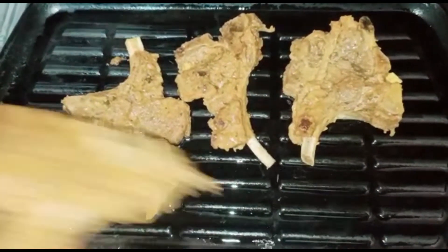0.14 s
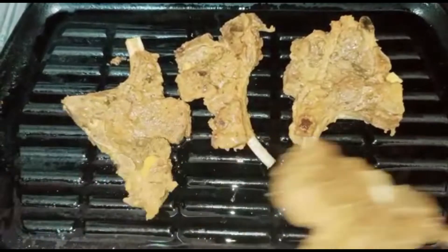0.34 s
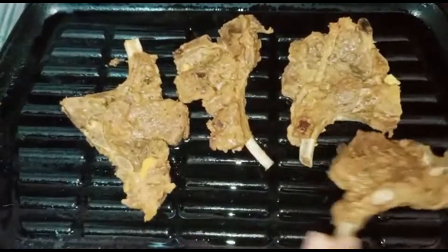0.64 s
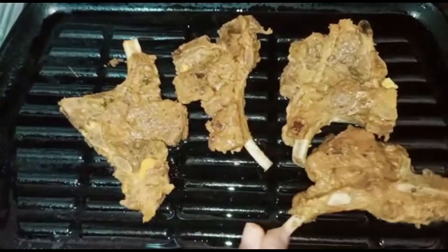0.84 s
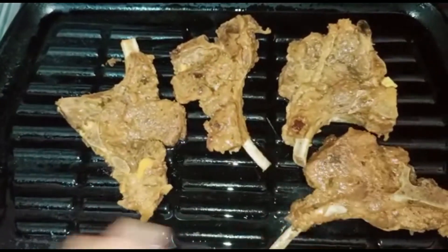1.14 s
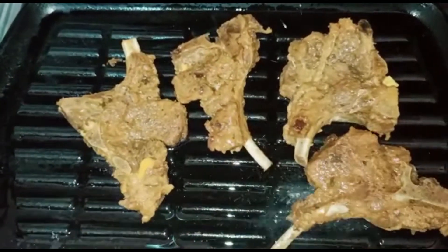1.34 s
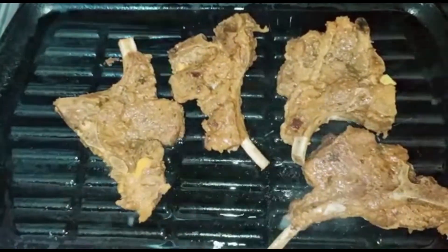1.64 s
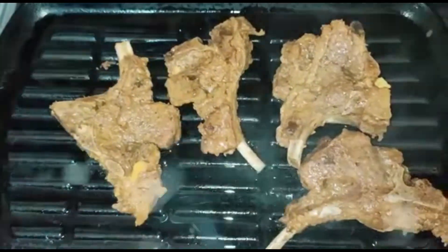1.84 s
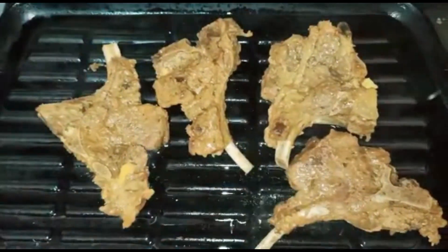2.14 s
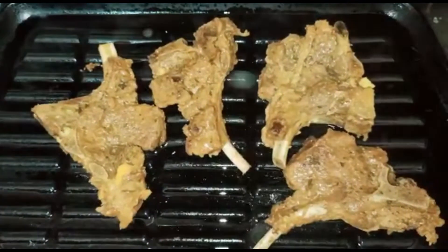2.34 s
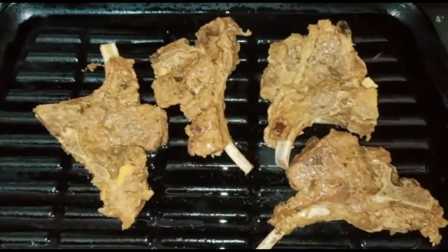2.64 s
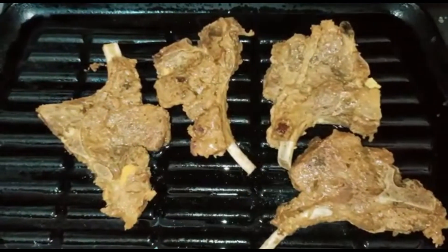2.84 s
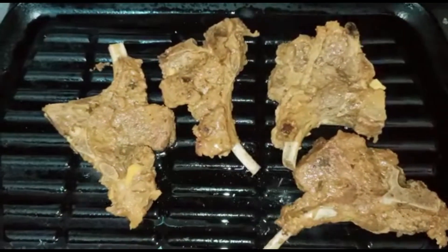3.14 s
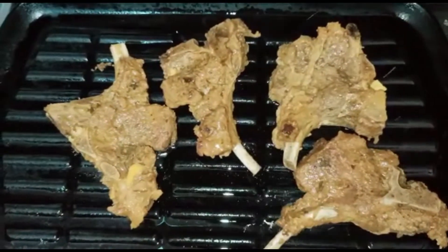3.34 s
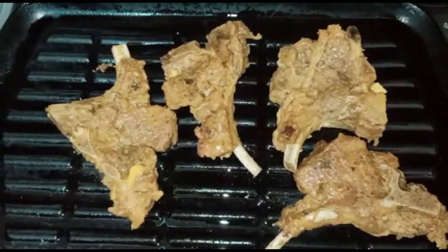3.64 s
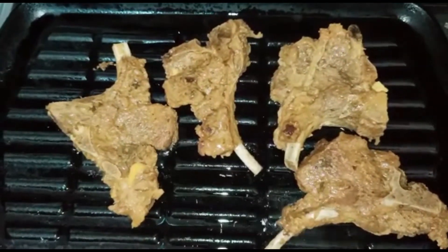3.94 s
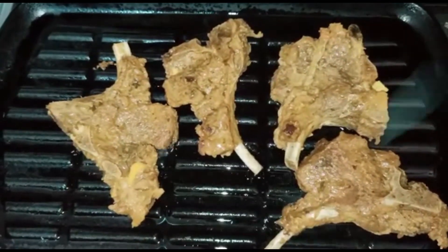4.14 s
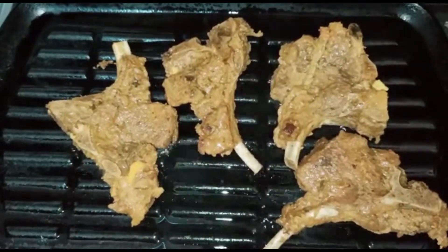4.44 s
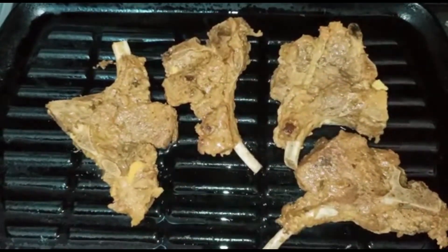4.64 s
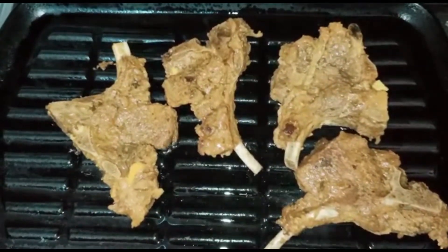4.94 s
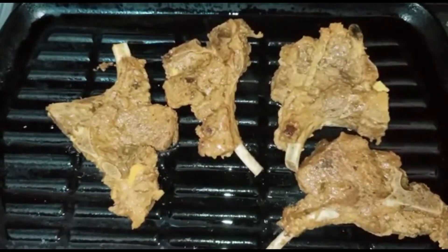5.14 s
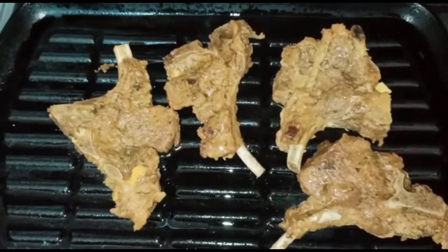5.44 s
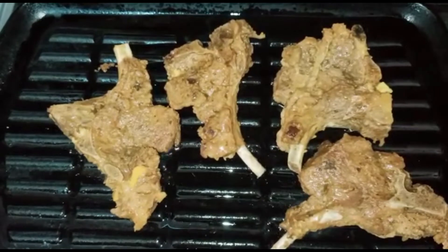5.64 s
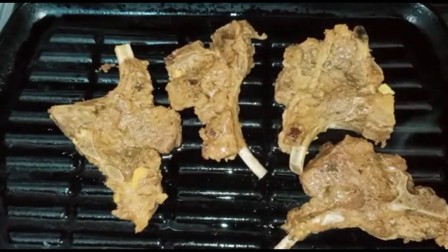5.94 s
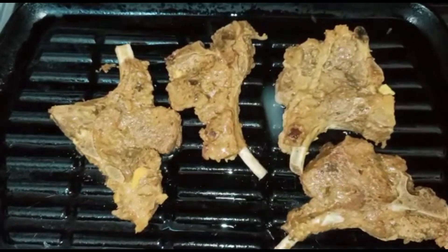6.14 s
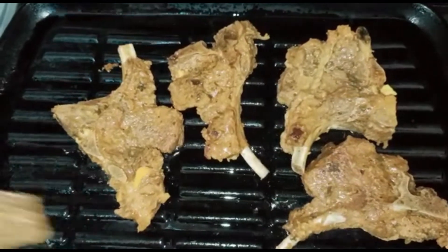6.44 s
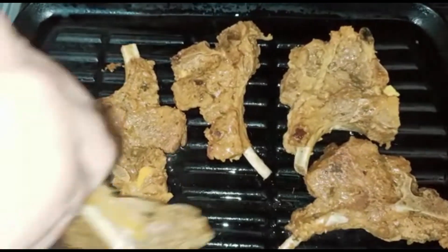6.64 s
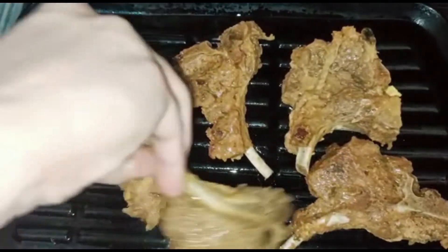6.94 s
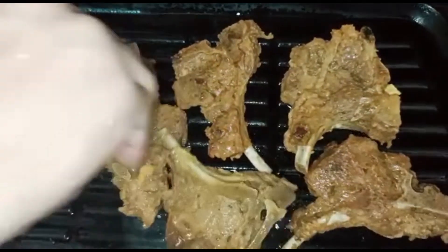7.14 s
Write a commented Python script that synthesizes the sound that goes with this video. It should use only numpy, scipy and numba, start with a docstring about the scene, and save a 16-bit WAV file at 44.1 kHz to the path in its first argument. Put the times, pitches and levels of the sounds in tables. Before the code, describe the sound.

Chops sizzle on a hot ribbed pan, heard close in stereo with almost no room sound. From 0 s a dense, crisp fry of tiny bursting fat bubbles and hissing steam is already running, with many sharp, bright pops per second spread left and right, each with a very short hard echo. Faint dull bumps occur around 0.9-1 s. At about 1.2-1.4 s a quiet, brief low tone dips and rises within soft rustling. From 1.5 s the sizzle grows, flaring fullest at about 1.85-2.1 s, then calms by 2.7 s, remaining slightly stronger than at the start. Crackling continues steadily, with strong snaps near 2.5 and 3.1 s, clustered pops and sputters around 3.8-4.3 s, and another sputter near 5.3 s. Barely audible low rumble, wavering hum, soft blips and occasional dull thuds sit underneath. Frying continues unbroken to the end at 7.3 s.

```python
"""Chops sizzle on a hot ribbed pan under a phone with two microphone ports, over rumble, hum and low noise bands.
From the start, damped sines make bubbles bursting in fat and sharper pops; filtered noise makes steam and spray.
Just after 1 s a short low tone dips and rises in rustling noise; near 1.9 s a fresh chop flares up, then calms.
Brief sputters, soft sine blips and dull noise thuds are scattered throughout; the pops echo off the hob."""
import sys
import numpy as np
from scipy import signal
from scipy.fft import rfft, irfft
from scipy.io import wavfile
from scipy.ndimage import uniform_filter1d
from numba import njit

SR = 44100
rng = np.random.default_rng(int(sys.argv[2]) if len(sys.argv) > 2 else 0)


def to_wav(sig):
    """Store sig (one row per channel, or 1-D mono) as 16-bit WAV at the path in sys.argv[1].

    Samples outside -1..1 are clipped; the rate is SR.
    """
    pcm = np.clip(np.atleast_2d(sig), -1, 1) * 32767
    pcm = np.round(pcm).astype(np.int16)
    wavfile.write(sys.argv[1], SR, pcm.T)  # frames by channels


N = 321489

# Spectrum of the deep rumble before its level is set: pitch_hz, density_db_per_hz
RUMBLE_SPECTRUM = [(25, -2), (36, -4.5), (47, -11.5), (70, -8.5), (100, -4.5), (125, 0.5), (170, -56.5)]
# Slow course of the rumble, before its waver: time_s, level_db
RUMBLE_LEVEL = [(0, -58), (1.1, -53.5), (1.4, -52), (2.2, -49.5), (2.55, -55), (2.9, -53.5), (3.1, -57),
                (4.0, -56), (4.3, -57), (6.3, -56), (6.9, -57), (7.29, -60)]
# Courses of the two hum tones, before their waver: time_s, lower_level_db, upper_level_db
HUM_LEVELS = [(0.0, -51, -60), (0.1, -58, -77), (0.55, -65, -62), (1.01, -61, -74), (1.38, -63, -55),
              (1.5, -82, -62), (1.67, -60, -61), (1.83, -51, -69), (1.89, -49, -58), (2.09, -75, -60),
              (2.13, -63, -79), (2.39, -54, -77), (2.48, -61, -78), (2.88, -64, -53.5), (3.17, -58, -70),
              (3.94, -64, -72), (4.37, -56, -75), (4.45, -62, -90), (4.51, -61, -68), (5.2, -59, -70),
              (5.24, -76, -93), (5.52, -59, -79), (5.58, -68, -68), (6.52, -67, -76), (6.56, -60, -72),
              (7.29, -76, -59.5)]
# Patchy low noise bands: centre_hz, width_hz, relative_level_db
LOW_BANDS = [(143, 26, -5), (251, 38, -27), (309.4, 34.4, -3.5), (396, 124, -2)]
# Level changes of the low noise bands, mostly dips: start_s, length_s, change_db
LOW_BAND_DIPS = [(.6, 0.11, -18), (1.027, 0.08, -12), (1.493, 0.32, -17), (1.853, 0.39, -20),
                 (2.43, 0.15, -17), (2.613, 0.09, -21), (3.256, .15, -20), (3.46, 0.082, -23),
                 (3.615, 0.081, -20), (3.842, .1, -30), (4.213, 0.22, -10), (5.202, 0.15, 2),
                 (5.504, 0.26, -9), (6.235, 0.54, -18.5), (6.946, 0.18, -25)]
# Soft low blips, each shared between the ports: time_s, peak_db, pitch_hz
SOFT_BLIPS = [(0.247, -59, 161), (1.096, -56, 151), (1.24, -46, 790), (1.272, -44, 568), (1.31, -50, 200),
              (1.831, -56, 164), (2.121, -48, 145), (2.239, -51.5, 460), (2.483, -56, 144),
              (2.546, -54, 363), (2.994, -52, 352), (3.217, -56, 298), (3.529, -51, 298), (3.943, -55, 326),
              (3.997, -58, 400), (4.357, -62, 182), (4.447, -52, 464), (4.58, -49, 151), (4.834, -54, 318),
              (4.897, -58, 374), (4.984, -52, 330), (5.062, -44.5, 306), (5.431, -55, 328),
              (5.69, -57, 344), (5.8, -46, 168), (5.83, -49, 166), (5.8, -50, 510), (5.85, -57, 540),
              (5.93, -53, 302), (5.975, -54, 304), (6.01, -58, 376), (6.06, -53, 317), (6.431, -54, 424),
              (6.84, -57.5, 238), (6.97, -51.5, 150), (7.111, -57, 324)]
# Dull thuds, nominal levels before halving: start_s, level_db, length_s
THUDS = [(0.9, -45.5, .05), (1.01, -53, 0.038), (1.418, -53, .04), (1.833, -49, 0.032), (3.201, -43, 0.025),
         (3.724, -43.5, 0.014), (3.997, -46, 0.022), (4.53, -47.5, 0.045), (5.76, -47.5, 0.095)]
# Short low tone and its noise: time_s, pitch_hz, tone_level_db, rustle_level_db, rumble_level_db
GROAN = [(1.17, 355, -72, -63, -67), (1.198, 363, -69, -60, -62), (1.212, 355, -47, -48, -59),
         (1.236, 330, -46, -55, -58), (1.256, 311, -49, -50, -57), (1.3, 305, -56, -48, -60),
         (1.33, 308, -57, -55, -55), (1.37, 334, -55, -55, -52), (1.4, 320, -67, -62, -59),
         (1.436, 320, -79, -63, -61), (1.46, 350, -90, -69, -64)]
# Sizzle level and lean to the left as the fresh chop flares and calms: time_s, level_db, left_minus_right_db
SIZZLE_COURSE = [(0, -33, 0.5), (1.32, -33.5, 1), (1.5, -31, 2.5), (1.68, -30, 1), (1.85, -25, -0.5),
                 (2.1, -25.5, 2), (2.68, -30.5, 2.5), (3.39, -31, 2.5), (3.75, -31, 1.5), (4.3, -32, 2.5),
                 (4.83, -32, 1.5), (5.24, -31, 2), (5.5, -32.5, 2), (6.5, -31.5, 2.5), (6.9, -32.5, 1.5),
                 (7.29, -31.5, 3.5)]
# Low body relative to the sizzle; it fills out as the fresh chop fries: time_s, relative_level_db
BODY_LEVEL = [(0, -16), (1.3, -14), (1.5, -13.5), (2.5, -14), (3.5, -14), (5, -13), (7.29, -13)]
# Gain of the lower resonance relative to the upper: time_s, relative_level_db
LOWER_RESONANCE_LEVEL = [(0, 0.5), (1.3, 0.5), (1.6, 1), (2.4, 0), (3.5, 0), (5, -0.1), (6.2, 0.2),
                         (7.29, -0.5)]
# Brief sputters, mostly swells, in the middle of the sizzle: centre_s, rise_db, length_s
SPUTTERS = [(.04, -1, .04), (0.35, 2, 0.15), (0.506, 1.5, 0.043), (0.862, 1.5, 0.14), (0.95, 4, 0.11),
            (1.22, 1.5, .12), (1.345, 3, 0.074), (1.45, 3.5, 0.12), (3.113, 2.5, 0.15), (3.237, 3.5, 0.12),
            (3.554, 3, 0.2), (3.65, 2.5, 0.091), (3.785, 0.5, .08), (3.91, 0, 0.064), (4, 3.5, 0.14),
            (4.088, 3.5, 0.095), (4.217, 4, 0.075), (4.333, 2.5, 0.08), (4.48, 2.5, 0.087),
            (5.04, 1, 0.058), (5.063, 3, 0.1), (5.15, 2.5, 0.043), (5.254, 2, 0.088), (5.326, 5, 0.2),
            (6.118, 1, 0.072), (6.34, 2, 0.032), (7.22, 2, 0.04), (7.285, -3, 0.037)]
# Timed pops, loud and faint, nominal peaks as heard through the ports: time_s, peak_db, pitch_hz, left_minus_right_db
TIMED_POPS = [(0.033, -17, 4330, -2), (0.0487, -14.5, 5430, 4), (0.0721, -14, 5250, 4),
              (0.0758, -20, 3450, 7), (0.121, -16.5, 5900, -12), (0.1262, -13.5, 5300, -2),
              (0.1786, -20, 3640, -7), (0.2021, -23, 4200, -3), (0.2117, -18, 5190, 2),
              (0.2356, -21, 3830, 11), (0.2575, -18, 3810, 1), (0.2835, -15, 5230, 7),
              (0.3314, -18, 5400, -2), (0.3366, -21, 4500, -5), (0.3432, -23, 3800, 7),
              (0.3626, -23, 3830, 14), (0.4101, -19, 4090, 3), (0.4796, -10, 4240, -2),
              (0.4867, -20, 4400, -1), (0.4946, -15, 5560, 0), (0.5012, -23, 4000, 3),
              (0.5719, -16, 3840, 5), (0.6315, -11, 5430, 4), (0.6375, -25, 3230, 9),
              (0.6527, -19, 4500, -5), (0.6564, -13.5, 4400, -4), (0.7199, -18, 4000, 7),
              (0.7236, -17, 3920, 9), (0.7351, -11, 4150, 8), (0.7385, -14, 3980, 5),
              (0.8161, -19, 4220, 5), (0.849, -11, 5380, -6), (0.8586, -12.5, 5400, -9),
              (0.8622, -20, 5770, -1), (0.8741, -13, 5100, -1), (0.8994, -13.5, 4900, -5),
              (0.9116, -14, 5270, -7), (0.9459, -13, 5470, -2), (0.9582, -21, 3700, 6),
              (0.9686, -8, 5360, -7), (0.9713, -30, 3720, 4), (0.9757, -19, 5560, -3),
              (1.0327, -12, 5100, -8), (1.0399, -19, 4530, -6), (1.0532, -16.5, 5880, -9),
              (1.0829, -16, 4310, 0), (1.0974, -20.5, 3030, 8), (1.164, -29, 4410, -10),
              (1.1719, -18, 5530, -9), (1.2219, -8.5, 5500, -4), (1.2654, -19, 5080, 0),
              (1.338, -15.5, 3600, 4), (1.4228, -10.5, 3600, 4), (1.4264, -29, 3550, 13),
              (1.4341, -10, 5430, 1), (1.4454, -13.5, 3550, -2), (1.4541, -18, 3880, 0),
              (1.5094, -12, 3640, 5), (1.514, -11, 3940, 13), (1.5315, -16, 3550, 16),
              (1.5476, -14.5, 3500, -4), (1.6953, -24, 5130, 6), (1.7052, -13.5, 3400, 7),
              (1.7237, -13, 3700, 3), (1.7635, -17, 3270, 4), (1.772, -16, 3750, 2), (1.8458, -15, 3400, 5),
              (1.8744, -23, 3510, -1), (1.9179, -8, 3830, 5), (1.9669, -14, 3300, 2),
              (2.0049, -18, 3330, 8), (2.0104, -23, 3380, 7), (2.0197, -20, 3340, 1),
              (2.0774, -16, 3290, 0), (2.0936, -13, 3770, 3), (2.1018, -9, 3740, 5), (2.1641, -11, 3270, 5),
              (2.2016, -16, 3230, 7), (2.2331, -19, 5120, 1), (2.2393, -19, 3900, 0),
              (2.2631, -23, 3640, 0), (2.2713, -9, 3700, 7), (2.2835, -10, 3600, 10),
              (2.3203, -26, 3530, 4), (2.3343, -25, 3500, 1), (2.3596, -18, 3560, -2),
              (2.3837, -11, 3730, 14), (2.4283, -11.5, 3380, 5), (2.4659, -23, 5600, -4),
              (2.4912, -17, 3290, 4), (2.5133, -5.5, 5300, 1), (2.5289, -19, 3660, 8),
              (2.585, -10, 5740, -8), (2.5891, -14, 3450, 0), (2.6553, -14, 3470, 5),
              (2.6664, -27, 5860, 7), (2.7312, -13, 4010, 4), (2.7809, -13, 3380, 4),
              (2.7935, -12, 3750, 11), (2.852, -11, 3980, 6), (2.8757, -23, 3290, 4),
              (2.9245, -17.5, 2860, 6), (2.9301, -23, 5940, 7), (2.9443, -24, 4480, -4),
              (3.0265, -11, 3700, 3), (3.0529, -15, 3700, -4), (3.0936, -6.5, 3880, 2),
              (3.1241, -20, 3420, 4), (3.1324, -13, 3480, 8), (3.1378, -7, 3650, 2), (3.1404, -19, 3600, 6),
              (3.1858, -25, 3320, 2), (3.2234, -9, 3870, -6), (3.2377, -21, 2950, 11),
              (3.278, -13.5, 5040, 0), (3.2838, -17, 3680, 0), (3.3232, -30, 3250, -9),
              (3.3675, -30, 3660, 2), (3.434, -12, 3750, -3), (3.4578, -17, 3560, 2),
              (3.5507, -14, 2970, 6), (3.5707, -14, 3440, 0), (3.5862, -24, 3510, 12),
              (3.6375, -13.5, 5710, -2), (3.6416, -11, 3770, -2), (3.6646, -14, 3700, -2),
              (3.6727, -12, 4360, 7), (3.7295, -13, 3500, 4), (3.7397, -14.5, 5600, -9),
              (3.8052, -13, 5600, -4), (3.8122, -9.5, 5430, -4), (3.8211, -10, 5210, 0),
              (3.824, -17, 3830, 1), (3.8809, -13, 5470, -4), (3.9011, -9, 3700, 2), (3.9045, -15, 3860, 3),
              (3.9101, -13, 3470, 4), (3.9147, -14, 4400, 3), (3.9191, -18, 3800, 12),
              (3.9624, -11, 3640, 1), (3.9685, -21, 3550, 10), (3.9738, -11, 5440, 2),
              (3.9773, -21, 3770, 7), (3.9843, -17, 4330, -6), (4.0057, -8.5, 3700, 4),
              (4.0285, -11, 4520, -5), (4.0771, -17.5, 3040, 10), (4.0872, -18, 5530, 6),
              (4.0954, -20, 3510, 3), (4.1019, -16, 3490, 6), (4.1311, -20.5, 3530, 6),
              (4.1893, -15, 3730, 9), (4.2133, -14, 5490, -6), (4.2163, -19, 3640, 5),
              (4.229, -24, 3080, 3), (4.2979, -17, 3700, 8), (4.3308, -20, 5490, -4),
              (4.3366, -13, 5680, -11), (4.3592, -16, 3920, 4), (4.4012, -23, 2970, 7),
              (4.4058, -27, 3450, 2), (4.4683, -13, 5400, -13), (4.4759, -26, 3340, -5),
              (4.4998, -13, 3420, 2), (4.5272, -9, 3480, 7), (4.6179, -18, 5230, -2),
              (4.6226, -18.5, 3380, 8), (4.6794, -14, 3790, 1), (4.7584, -21, 3200, 8),
              (4.7644, -27, 3680, 4), (4.816, -28, 3490, 7), (4.8355, -14, 5400, 0),
              (4.8474, -16, 3600, -13), (4.8744, -19, 3660, -6), (4.9026, -20, 3790, -4),
              (4.9295, -30, 3570, -7), (4.9407, -17, 3750, 0), (4.9458, -23, 3830, 6),
              (4.9661, -25, 4650, 0), (5.0083, -18.5, 3300, 4), (5.0189, -20, 3020, 10),
              (5.0434, -20, 5620, -10), (5.0535, -16, 3730, -1), (5.0667, -18, 3470, 8),
              (5.1102, -13, 5770, -16), (5.1521, -21, 3540, 2), (5.209, -11.5, 5560, -9),
              (5.2299, -10, 3920, 8), (5.2357, -22, 3470, 5), (5.2972, -25, 4540, 2),
              (5.3013, -8, 5250, -6), (5.3208, -12, 5300, -8), (5.3629, -17, 3850, -2),
              (5.3679, -18, 4460, 5), (5.3928, -20, 3400, 8), (5.4607, -23, 3750, -7),
              (5.4907, -24, 3660, 6), (5.5347, -31, 3900, 2), (5.5515, -26, 3360, 12),
              (5.69, -16, 3830, -4), (5.716, -17, 3490, -4), (5.7515, -14, 4460, 5),
              (5.7654, -13, 3920, -2), (5.8154, -27, 3420, -3), (5.8245, -19, 3510, 9),
              (5.8368, -18, 3550, 4), (5.8397, -17, 3400, 9), (5.8441, -24, 3400, 8), (5.89, -23, 3360, -6),
              (5.9201, -19, 3400, 7), (5.9491, -14, 3730, 10), (5.9539, -16, 3470, -5),
              (5.9818, -16, 5000, -6), (6.0186, -13.5, 5200, -4), (6.0235, -27, 3530, 10),
              (6.0911, -10, 5350, 4), (6.1089, -15.5, 3600, 5), (6.1818, -15, 3750, 8),
              (6.2055, -10, 3880, 7), (6.2395, -9, 3480, 7.5), (6.2668, -30, 5900, 2),
              (6.3371, -11.5, 4410, -1), (6.368, -15, 3850, 4), (6.4717, -9, 3790, 5),
              (6.4768, -18, 3640, 11), (6.4878, -26, 3680, 8), (6.525, -8, 5400, -2),
              (6.541, -27, 3470, 11), (6.5508, -23, 5560, -1), (6.5707, -23, 3530, 10),
              (6.6107, -25, 3830, 7), (6.6158, -20, 3850, -1), (6.6297, -28, 4440, 1),
              (6.6496, -18.5, 3400, 8), (6.6826, -21, 3170, 9), (6.6887, -13.5, 3700, 4),
              (6.701, -12, 3880, 8), (6.7446, -27, 3400, 4), (6.7843, -16, 3940, 9),
              (6.7947, -19, 3730, -2), (6.8673, -17.5, 3100, -3), (6.8735, -21, 2950, 6),
              (6.8812, -17, 5050, 7), (6.9044, -20, 3770, -11), (6.9412, -16, 5230, -6),
              (6.953, -27, 4480, -6), (6.9566, -23, 3450, -3), (7.007, -26, 3770, 0),
              (7.0182, -22, 3830, -1), (7.0244, -16, 5680, -4), (7.0289, -24, 3290, 1),
              (7.0718, -15.5, 3520, 8), (7.0981, -17, 3900, 14), (7.1417, -11, 3700, 0),
              (7.1716, -8.5, 3530, 4), (7.1759, -16, 4500, 6), (7.1804, -17, 3730, 2),
              (7.2156, -19, 4480, -9), (7.2276, -16, 3340, 5), (7.2668, -16, 3400, 12),
              (7.2744, -19, 3060, 3)]
# Frequency response of each microphone port: pitch_hz, gain_db
LEFT_PORT = [(450, -83), (850, -42), (1000, -16.5), (1500, -18.5), (1900, -12.5), (2500, -12.5),
             (3100, -6.5), (3600, -3.5), (3950, 1), (4150, -5.5), (4800, -13), (5300, -4.5), (5900, -16),
             (7500, -16), (11500, -13), (14500, -17)]
RIGHT_PORT = [(450, -86), (850, -22.5), (1000, -17), (1500, -16.5), (1900, -14.5), (2500, -13.5),
              (3200, -14), (3800, -6.5), (4400, -7.5), (4750, -8), (5600, -2.5), (6200, -8.5),
              (6800, -13.5), (8000, -15), (11000, -17), (14400, -13)]

HUM_WANDER_HZ = 1.41
LOW_BANDS_DB, BLIP_LAYER_DB = -65, -59  # before their changes in time
DIP_EDGE_S, BLIP_LAYER_DIP_SHARE = 0.024, 0.17
BLIP_LAYER_LOW_HZ, BLIP_LAYER_HIGH_HZ = 489.5, 862
BLIP_LAYER_FOLLOWS = 0.63  # share of the sizzle's swell
BLIP_S = 0.045
FAINT_BLIP_DB, FAINT_BLIP_SPREAD_DB = -57, -0.5
RIGHT_LEAD_S, LEAD_SPREAD_S = 0.0003367, 0.000035
TAIL_T60_S, TAIL_DB = 0.04, -7  # dense reflections off hob and splashback
FURTHER_POP_DB, FURTHER_POP_SPREAD_DB, FURTHER_POP_PAN_DB = -25, 1, 1.5
BODY_HZ, MIDDLE_HZ, SPRAY_HZ = 2114, 4360, 6830  # MIDDLE_HZ lies between the sizzle's two resonances
SPRAY_DB = -6.5  # high spray relative to the sizzle
SPUTTER_REACH = 0.34  # share of a sputter's rise in the body and the spray
TOP_HZ = 14500

OPPOSITE = np.array([[1], [-1]])  # opposite signs at the left and right ports


def undb(db):
    """Logarithmic level: decibels become an amplitude ratio."""
    return 10 ** (np.asarray(db) / 20)


def level(x, db):
    """Mean power: scale a signal to a given rms level."""
    return x * undb(db) / np.sqrt(np.mean(x ** 2))


def curve(s, values):
    """Linear interpolation: straight lines between points in time."""
    return np.interp(np.arange(N) / SR, s, values)


def read(table, hz):
    """Logarithmic frequency: interpolate a spectrum's dB along log pitch."""
    f, db = np.transpose(table)
    return np.interp(np.log(hz), np.log(f), db)


def colour(x, table, size=4096):
    """Minimum phase: folding the cepstrum of the log gain gives a causal filter."""
    hz = np.arange(size // 2 + 1) * SR / size + 1
    cepstrum = irfft(np.log(undb(read(table, hz))))
    cepstrum[1:size // 2] *= 2
    cepstrum[size // 2 + 1:] = 0
    response = irfft(np.exp(rfft(cepstrum)))[:size // 2]
    return signal.oaconvolve(x, response)[:N]


def band(lo_hz, hi_hz, channels=1):
    """Band limitation: steeply filtered white noise of rms 1."""
    sos = signal.butter(4, [lo_hz, hi_hz], "bandpass", fs=SR, output="sos")
    return level(signal.sosfilt(sos, rng.standard_normal((channels, N))), 0)


def walk(rate):
    """Random modulation: levels held for 1 / rate s and smoothed twice; spread near 1."""
    hold = int(SR / rate)
    steps = np.repeat(rng.standard_normal(N // hold + 1), hold)
    return 1.3 * uniform_filter1d(uniform_filter1d(steps, hold), hold)[:N]


def rumble():
    """Partial coherence: deep noise mixed from a shared and an opposed part."""
    mid, side = (colour(n, RUMBLE_SPECTRUM, size=8192) for n in band(26.0, 93.0, channels=2))
    noise = level(mid + 0.5 * side * OPPOSITE, -5.0)
    waver_db = curve(*np.transpose(RUMBLE_LEVEL)) + 1.3 * walk(7.0)
    return noise * undb(waver_db)


def hum():
    """Frequency and phase modulation: two low tones swell and fade, unsteady in pitch and between ports."""
    s, *levels = np.transpose(HUM_LEVELS)
    out = np.zeros((2, N))
    for hz, db in zip((46, 98), levels):
        gain = np.sqrt(2) * undb(curve(s, db) + 2.3 * walk(8.0))
        phase = 2 * np.pi * np.cumsum(hz + HUM_WANDER_HZ * walk(3.5)) / SR
        out += gain * np.sin(phase + 0.53 * walk(2.96) * OPPOSITE)
    return out


def low_band_dips():
    """Level envelope: decibel changes with straight edges."""
    t = np.arange(N) / SR
    return sum(db * np.clip(np.minimum(t - s, s + length - t) / DIP_EDGE_S, 0, 1)
               for s, length, db in LOW_BAND_DIPS)


def patches(hz, width, depth_db):
    """Gated noise: a narrow band, partly shared by the ports, comes and goes in short patches."""
    mid, side = rng.standard_normal((2, N))
    gate = undb(depth_db * np.tanh(15.0 * walk(30)))
    sos = signal.butter(4, [hz - width / 2, hz + width / 2], "bandpass", fs=SR, output="sos")
    return level(signal.sosfilt(sos, gate * (mid + 1.02 * side * OPPOSITE)), 0)


def low_patches(dip_db):
    """Superposition: patchy narrow low noise bands add up and dip together in level."""
    bands = sum(undb(db) * patches(hz, width, depth_db=16.5) for hz, width, db in LOW_BANDS)
    return level(bands, LOW_BANDS_DB) * undb(dip_db)


def blips(rows):
    """Windowed sine: each blip swells and fades softly, much alike at both ports."""
    t = np.arange(int(BLIP_S * SR)) / SR
    out = np.zeros((2, N + len(t)))
    side = OPPOSITE / 2
    for (s, peak_db, hz), g in zip(rows, rng.standard_normal((len(rows), 2))):
        tone = np.sin(2 * np.pi * hz * t + 0.72 * g[1] * side)
        blip = undb(peak_db + 2.7 * g[0] * side) * tone
        i = max(int((s - .008) * SR), 0)
        out[:, i:i + len(t)] += blip * np.sin(np.pi * t / BLIP_S) ** 2
    return out[:, :N]


def faint_blips(count=130):
    """Random arrivals: fainter blips at log-uniform pitches."""
    u, g = rng.random((count, 2)).T, rng.standard_normal(count)
    peak_db = FAINT_BLIP_DB + FAINT_BLIP_SPREAD_DB * g
    return blips(np.transpose([u[0] * N / SR, peak_db, 145 * 2.9 ** u[1]]))


def overlapping_blips(count=380):
    """Random superposition: soft low-mid blips at random moments and pitches."""
    u, g = rng.random((count, 2)).T, rng.standard_normal(count)
    hz = BLIP_LAYER_LOW_HZ + (BLIP_LAYER_HIGH_HZ - BLIP_LAYER_LOW_HZ) * u[1]
    return blips(np.transpose([u[0] * N / SR, 2.7 * g, hz]))


def blip_layer(dip_db):
    """Amplitude modulation: overlapping soft blips partly follow the level of the sizzle and the dips."""
    s, sizzle_db, _ = np.transpose(SIZZLE_COURSE)
    swell_db = BLIP_LAYER_FOLLOWS * (curve(s, sizzle_db) - np.mean(sizzle_db))
    change_db = BLIP_LAYER_DIP_SHARE * dip_db + swell_db + 2.0 * walk(13)
    return level(overlapping_blips(), BLIP_LAYER_DB) * undb(change_db)


def low_bed():
    """Superposition: deep rumble, patchy low bands and soft blips; all but the rumble share the dips."""
    dip_db = low_band_dips()
    return rumble() + low_patches(dip_db) + blip_layer(dip_db) + faint_blips() * undb(dip_db)


def thuds():
    """Windowed noise: short puffs of low noise with soft edges."""
    t = np.arange(N) / SR
    puffs = sum(undb(db) * np.sin(np.pi * np.clip((t - s) / length, 0, 1)) ** 2
                for s, db, length in THUDS)
    return puffs * band(145, 1180) / 2


def groan():
    """Integrated frequency: a gliding tone with a weak octave sounds over a rustle and a low rumble."""
    s, hz, db, rustle_db, rumble_db = np.transpose(GROAN)
    t = np.arange(N) / SR
    phase = 2 * np.pi * np.cumsum(curve(s, hz)) / SR
    gate = uniform_filter1d(1. * ((t > s[0]) & (t < s[-1])), size=600)
    tone = np.sqrt(2) * undb(curve(s, db)) * (np.sin(phase) + undb(-17) * np.sin(2 * phase))
    rustle = undb(curve(s, rustle_db)) * band(230, 1240)
    low_noise = undb(curve(s, rumble_db)) * band(127, 220)
    return gate * (tone + rustle + low_noise)


@njit
def rings(n, start, turn, fade, size):
    """Damped oscillation: sines begin between samples and stop once they have decayed by 50 dB."""
    out = np.zeros(n)
    for k in range(len(start)):
        i = max(int(start[k]) + 1, 0)
        step = np.exp(1j * turn[k] - fade[k])
        z = size[k] * np.exp((1j * turn[k] - fade[k]) * (i - start[k]))
        for j in range(i, min(n, i + int(5.8 / fade[k]))):
            out[j] += z.imag
            z *= step
    return out


def bursts(s, hz, cycles, size, pan_db, place):
    """Arrival-time difference: bursts lead at the right port by an amount set by their place on the pan."""
    turn = 2 * np.pi * hz / SR
    fade = turn / (2 * np.pi * cycles)  # amplitude falls to 1/e in this many cycles
    lead = (RIGHT_LEAD_S + LEAD_SPREAD_S * place) * SR
    left = rings(N, s * SR, turn, fade, size * undb(pan_db / 2))
    right = rings(N, s * SR - lead, turn, fade, size * undb(-pan_db / 2))
    return np.array([left, right])


def steam(count=3):
    """Turbulence noise: steady jets, one under each chop, with their own port leads over diffuse hiss."""
    out = 1.4 * rng.standard_normal((2, N)) + undb(-5) * band(1350, 2520, channels=2)
    for place in np.linspace(-1.4, 1.4, count):
        jet = rng.standard_normal(N)
        lead = int((RIGHT_LEAD_S + LEAD_SPREAD_S * place) * SR)
        out += [np.roll(jet, lead), jet]
    return level(out, 0)


def bubbles(count=26000):
    """Equal energy: dense small damped bursts, some louder, balance duration against size at each pitch."""
    u, g = rng.random((count, 4)).T, rng.standard_normal((count, 2)).T
    hz = 900 + 14100 * u[1]
    extra_db = np.minimum(-2.8 * np.log(1 - u[2]), 12)
    size = undb(extra_db) * np.sqrt(hz)
    cycles = 1.03 + 1.66 * u[3] ** 2
    return level(bursts(u[0] * N / SR, hz, cycles, size, 2.7 * g[0], g[1]), 0)


def further_pops(count=70):
    """Random arrivals: further faint pops are pitched near either resonance of the ports."""
    u, g = rng.random((count, 2)).T, rng.standard_normal((count, 3)).T
    hz = np.where(u[1] < .65, 3700, 5400) * np.exp(0.047 * g[0])
    peak_db = FURTHER_POP_DB + FURTHER_POP_SPREAD_DB * g[1]
    return np.transpose([u[0] * N / SR, peak_db, hz, FURTHER_POP_PAN_DB + 4 * g[2]])


def pops(count=4):
    """Damped resonance: a short crack and a bubble's ring precede a few weaker droplets."""
    s, peak_db, hz, pan_db = np.transpose(np.vstack([TIMED_POPS, further_pops()]))
    left_db, right_db = read(LEFT_PORT, hz), read(RIGHT_PORT, hz)
    # Offset the port gains, since peaks and sides are given as heard through them
    size = undb(peak_db - (left_db + right_db) / 2)
    side_db = pan_db - (left_db - right_db)
    g = rng.standard_normal((len(s), 2 * count + 1)).T
    place = g[-1]
    crack = bursts(s, 1.08 * hz, 0.89 + 0 * hz, size * undb(1.5), side_db, place)
    ring = bursts(s, hz, 2.5 + 0 * hz, size * undb(-4.5), side_db, place)
    out = crack + ring
    for k in range(count):
        late = .0007 * 1.9 ** k * np.exp(.3 * g[k])
        droplet_hz = hz * np.exp(0.39 * g[count + k])
        droplet_size = size * undb(-4.5 - 620 * late)
        out += bursts(s + late, droplet_hz, 1.4 + 0 * hz, droplet_size, side_db, place)
    return out


def echoes(x):
    """Diffuse reverberation: convolve with a short decaying noise tail, different at each port."""
    t = np.arange(int(.06 * SR)) / SR
    tail = rng.standard_normal((2, len(t))) * undb(-60 * t / TAIL_T60_S) * (t > .0008)
    tail *= undb(TAIL_DB) / np.sqrt(np.sum(tail ** 2, axis=1, keepdims=True))
    return x + signal.oaconvolve(x, tail, axes=1)[:, :N]


def ports(x):
    """Linear filtering: each microphone port colours its own channel."""
    return np.array([colour(x[0], LEFT_PORT), colour(x[1], RIGHT_PORT)])


def filtered(x, hz, kind):
    """Zero-phase filtering: forward and backward passes keep the bands aligned in time."""
    return signal.sosfiltfilt(signal.butter(2, hz, kind, fs=SR, output="sos"), x)


def flicker(db):
    """Amplitude modulation: a random gain changes at two rates."""
    return undb(db * (walk(7) + walk(25)))


def sizzle():
    """Band modulation: bubbles and steam throb together, bands flicker alone, sputters act most on the middle."""
    t = np.arange(N) / SR
    throb = undb(1.07 * walk(30) + 0.61 * walk(110))
    fry = ports(echoes(throb * bubbles()) + np.sqrt(throb) * steam())
    body = filtered(fry, BODY_HZ, "low")
    lower = filtered(fry, MIDDLE_HZ, "low")
    spray = filtered(fry, SPRAY_HZ, "high")
    lower_gain = undb(curve(*np.transpose(LOWER_RESONANCE_LEVEL))) * flicker(db=0.56)
    middle = level(lower_gain * (lower - body) + flicker(db=0.3) * (fry - lower - spray), 0)
    edges = undb(curve(*np.transpose(BODY_LEVEL))) * flicker(db=0.87) * level(body, 0)
    edges += flicker(db=0.4) * level(spray, SPRAY_DB)
    rise_db = sum(db * np.cos(np.pi * np.clip((t - at) / length, -.5, .5)) ** 2
                  for at, db, length in SPUTTERS)
    return undb(rise_db) * middle + undb(SPUTTER_REACH * rise_db) * edges


def pan():
    """Superposition: the swelling, swaying sizzle is joined by pops that echo off the hob."""
    s, sizzle_db, pan_db = np.transpose(SIZZLE_COURSE)
    sway = undb(curve(s, pan_db) * OPPOSITE / 2)
    return undb(curve(s, sizzle_db)) * sway * sizzle() + ports(echoes(pops()))


def scene():
    """Superposition: low bed, hum, blips, thuds, groan and pan sound together."""
    return low_bed() + hum() + blips(SOFT_BLIPS) + thuds() + groan() + pan()


def record(dry):
    """Low-pass filtering: the phone steeply cuts the top."""
    return signal.sosfilt(signal.ellip(12, .2, 80, TOP_HZ, fs=SR, output="sos"), dry)


dry = scene()
out = record(dry)
to_wav(out)
```